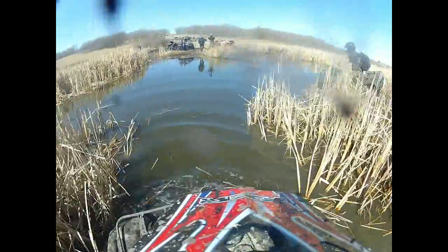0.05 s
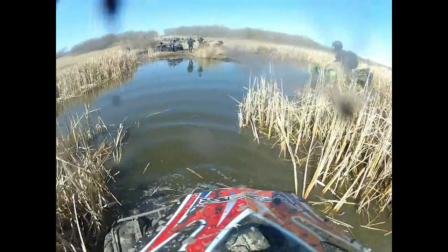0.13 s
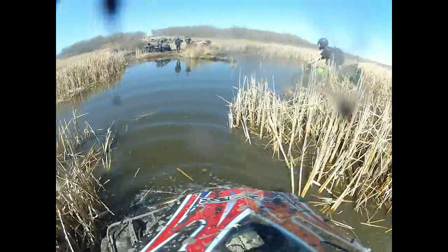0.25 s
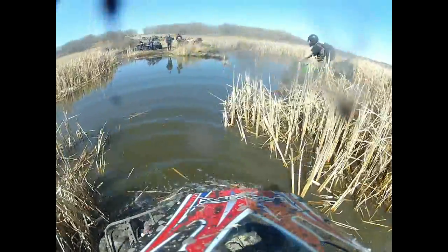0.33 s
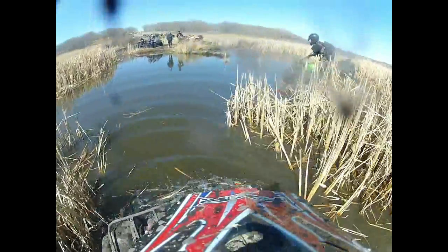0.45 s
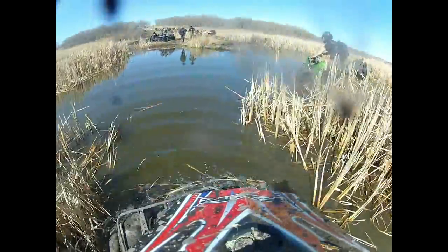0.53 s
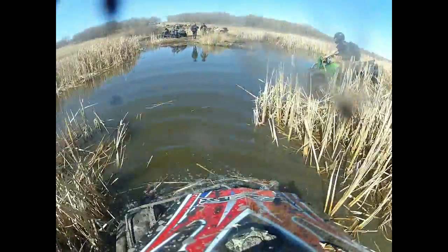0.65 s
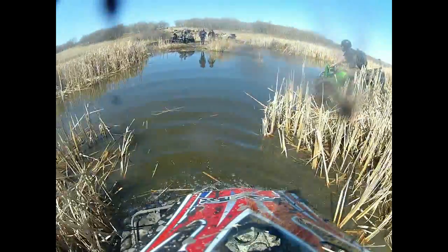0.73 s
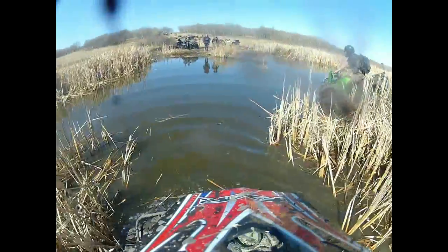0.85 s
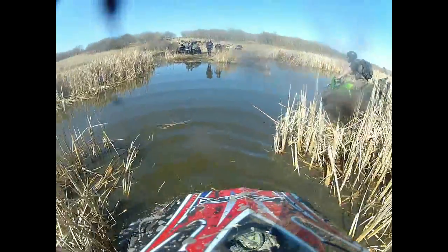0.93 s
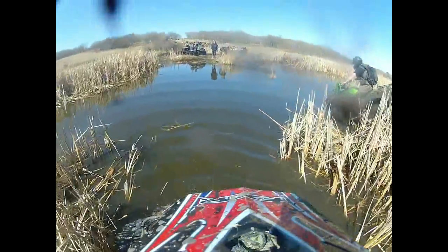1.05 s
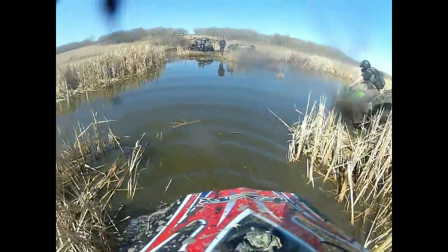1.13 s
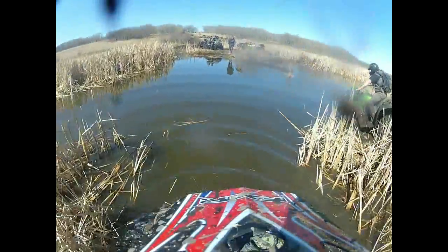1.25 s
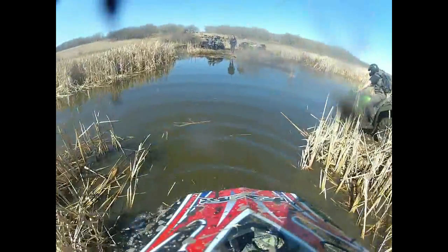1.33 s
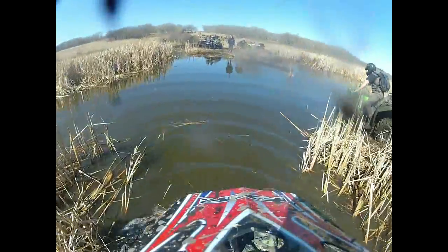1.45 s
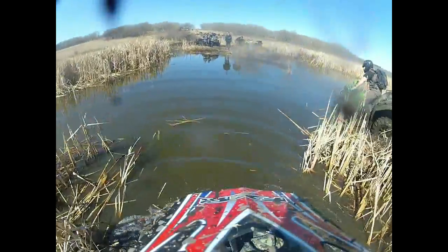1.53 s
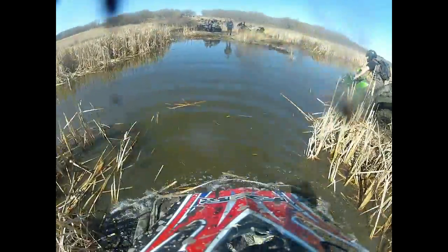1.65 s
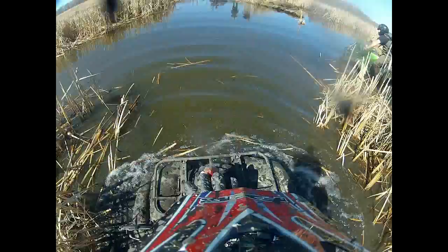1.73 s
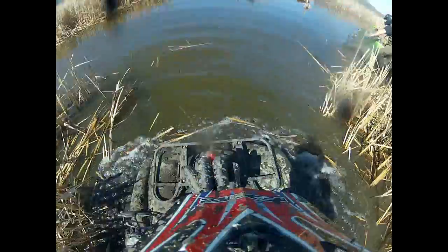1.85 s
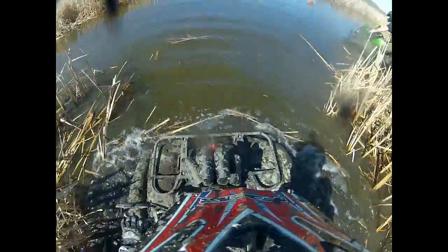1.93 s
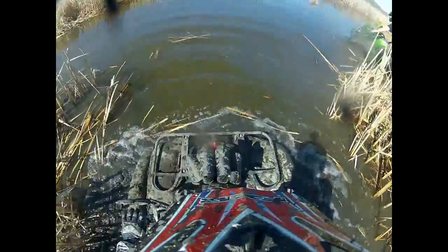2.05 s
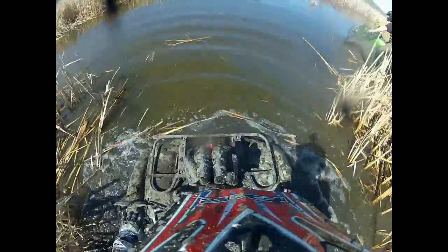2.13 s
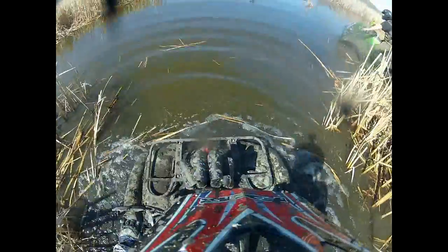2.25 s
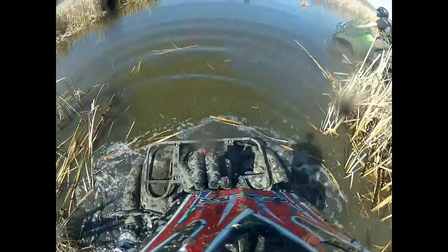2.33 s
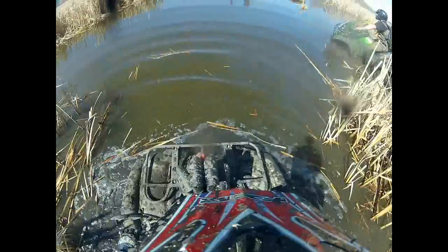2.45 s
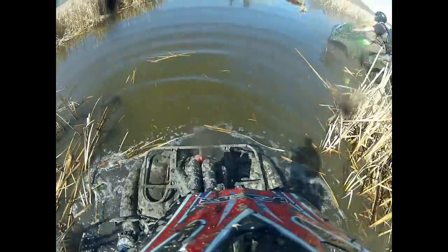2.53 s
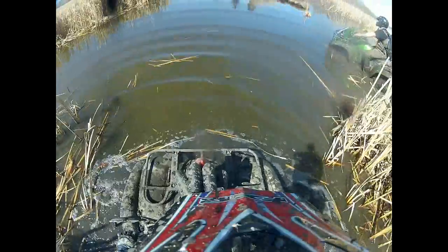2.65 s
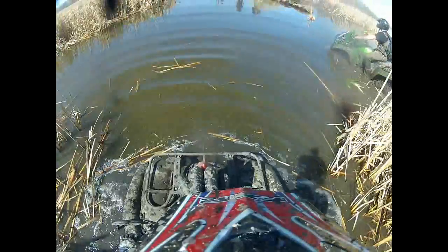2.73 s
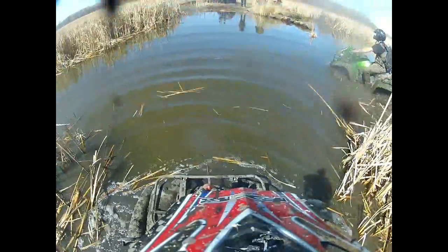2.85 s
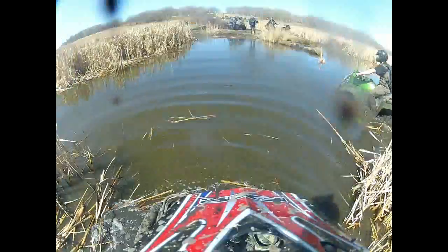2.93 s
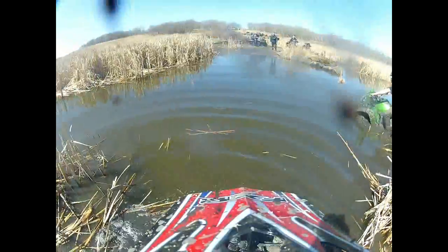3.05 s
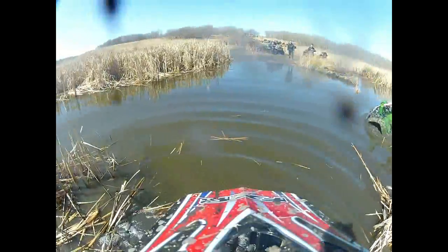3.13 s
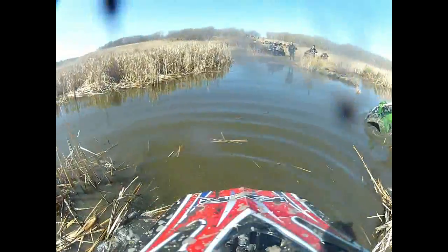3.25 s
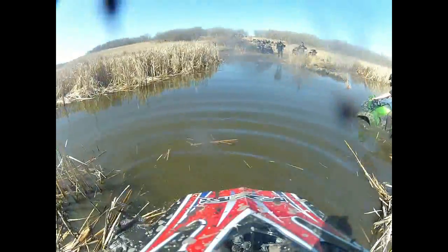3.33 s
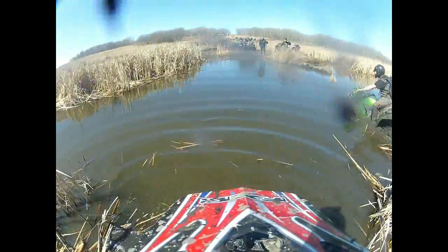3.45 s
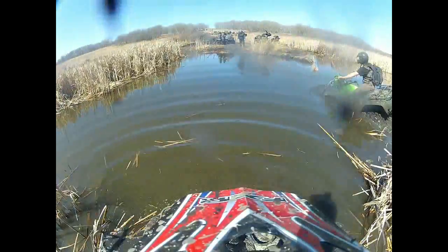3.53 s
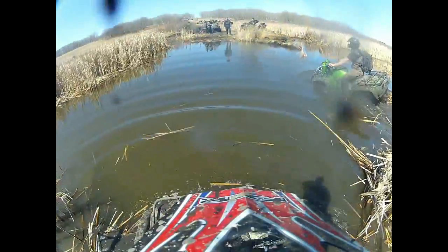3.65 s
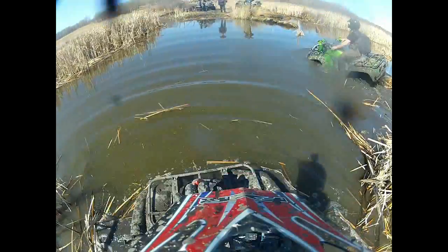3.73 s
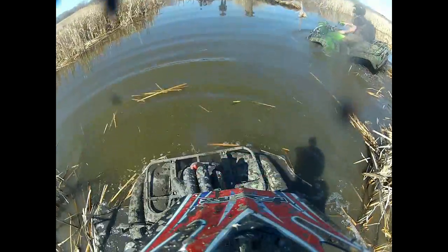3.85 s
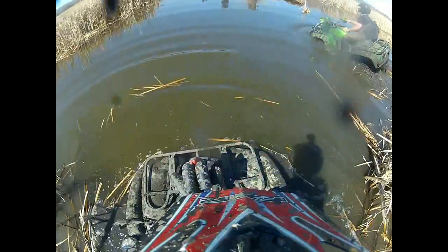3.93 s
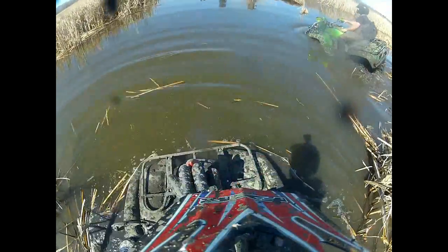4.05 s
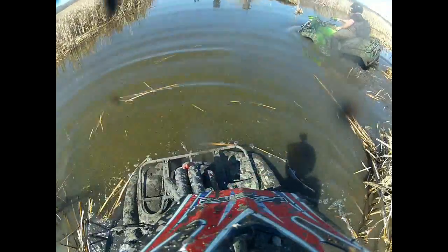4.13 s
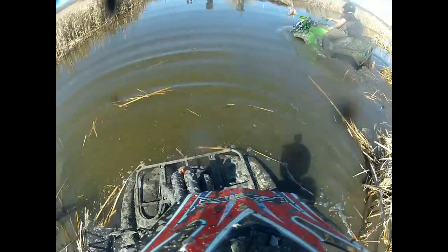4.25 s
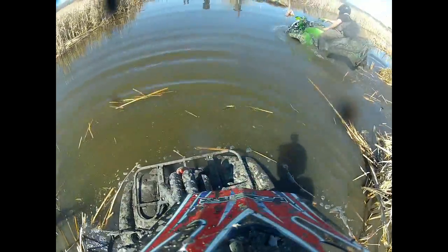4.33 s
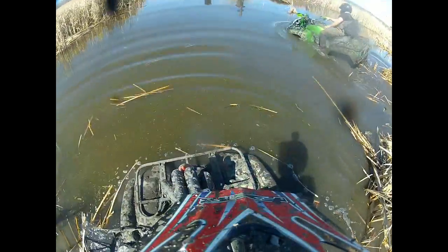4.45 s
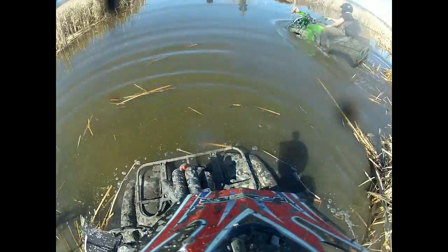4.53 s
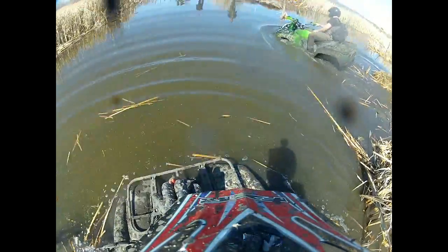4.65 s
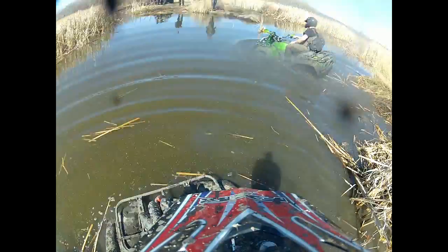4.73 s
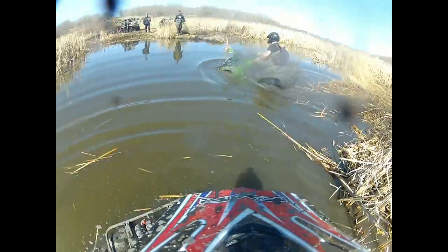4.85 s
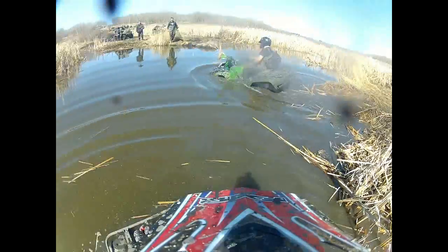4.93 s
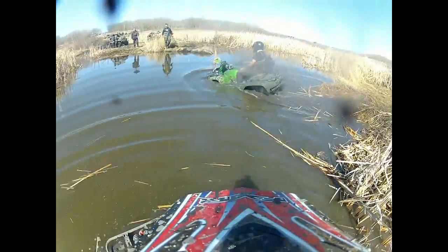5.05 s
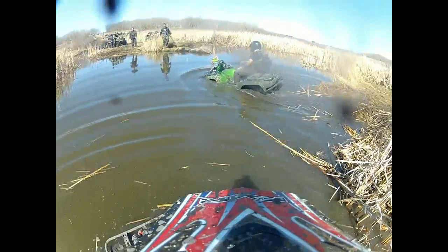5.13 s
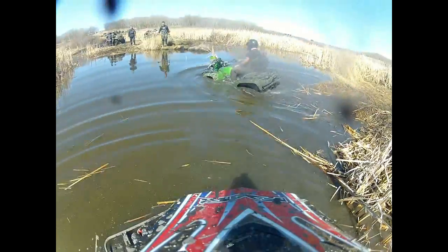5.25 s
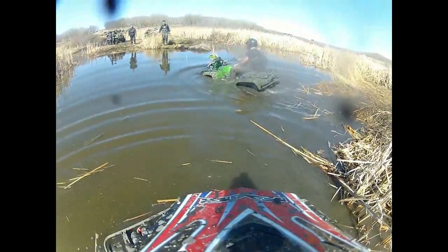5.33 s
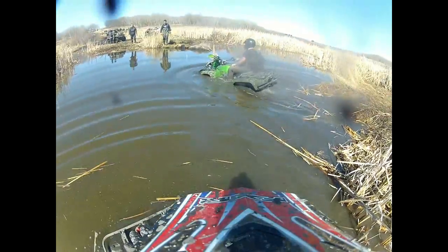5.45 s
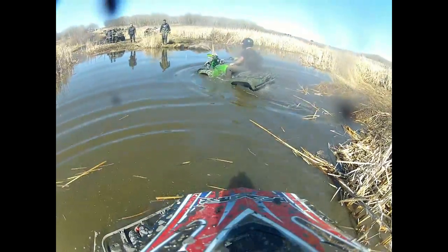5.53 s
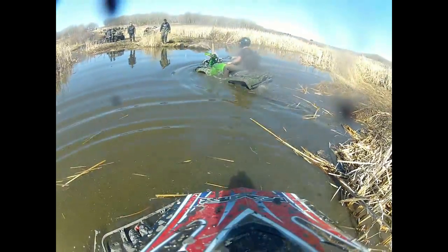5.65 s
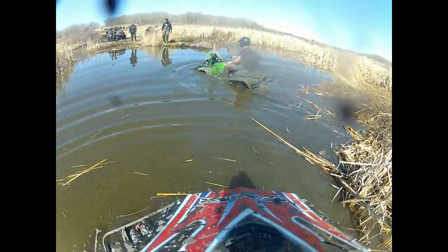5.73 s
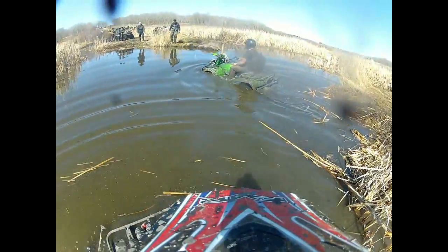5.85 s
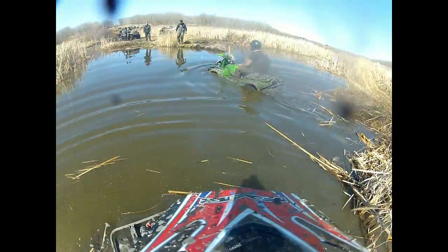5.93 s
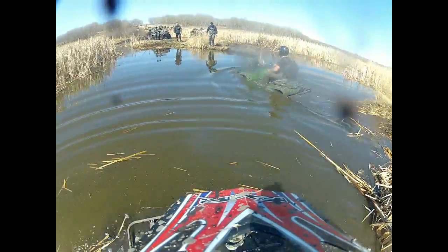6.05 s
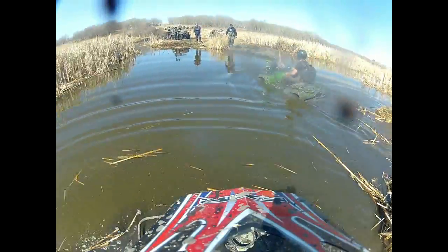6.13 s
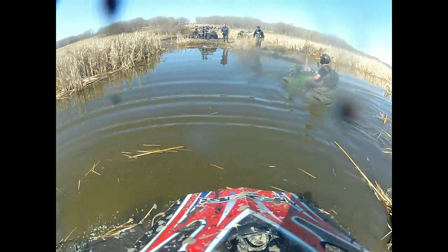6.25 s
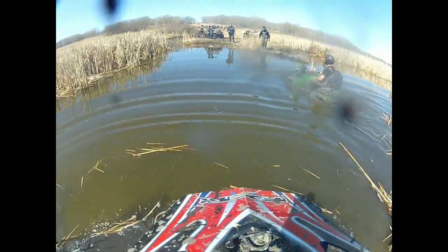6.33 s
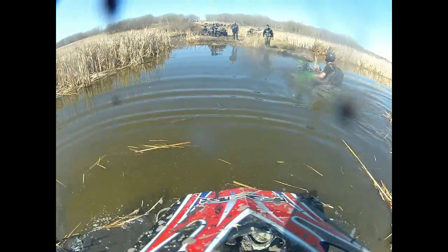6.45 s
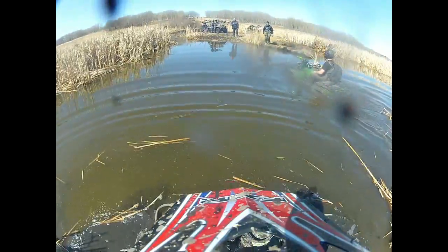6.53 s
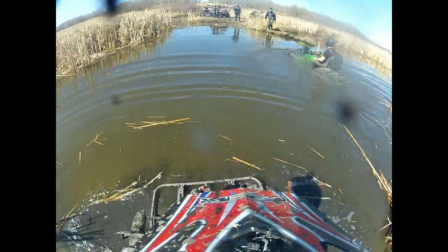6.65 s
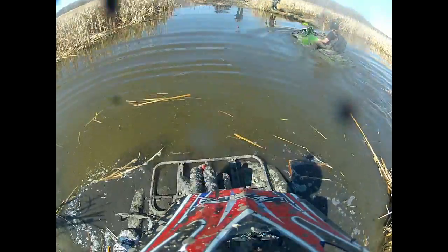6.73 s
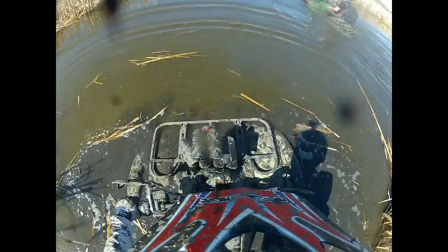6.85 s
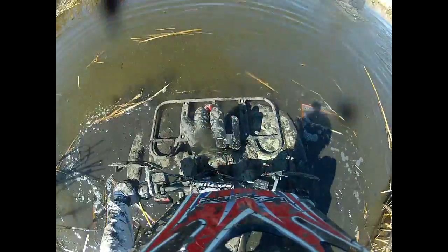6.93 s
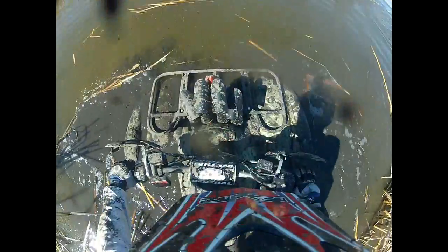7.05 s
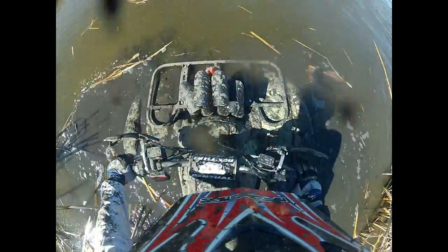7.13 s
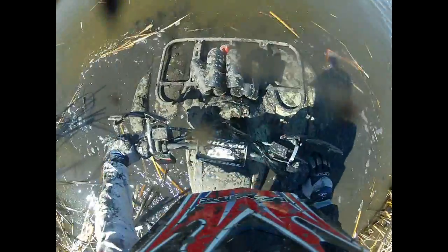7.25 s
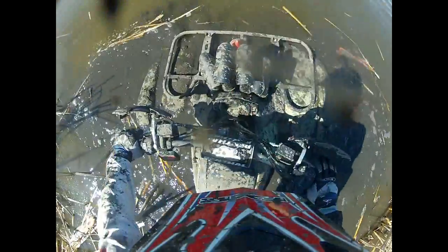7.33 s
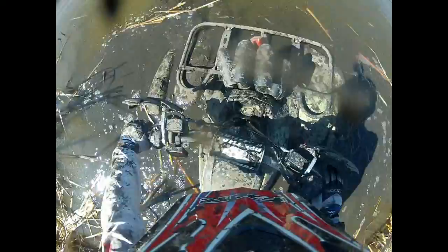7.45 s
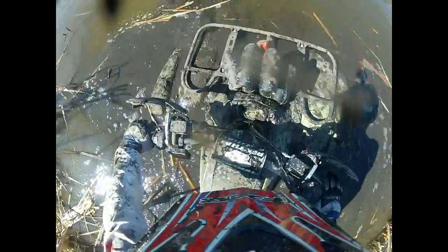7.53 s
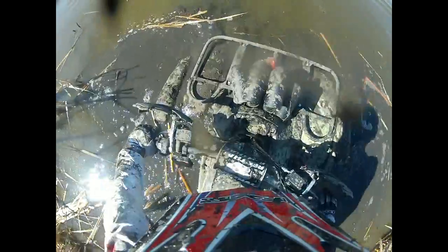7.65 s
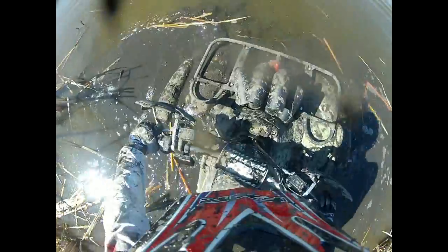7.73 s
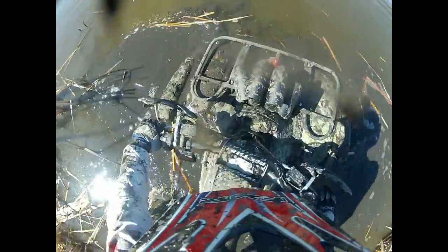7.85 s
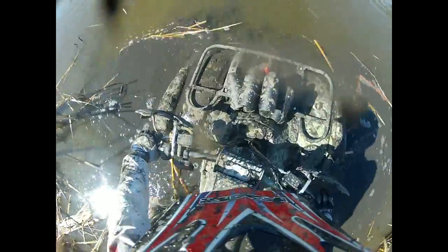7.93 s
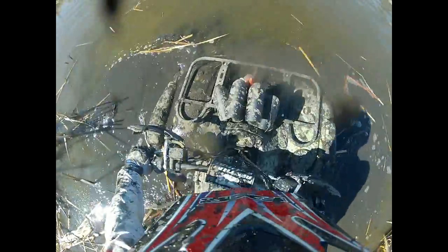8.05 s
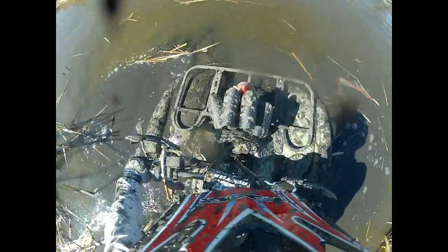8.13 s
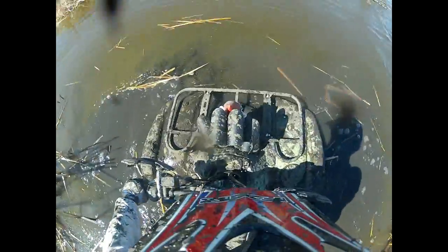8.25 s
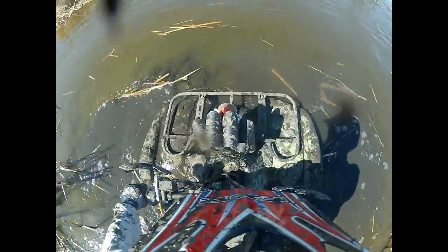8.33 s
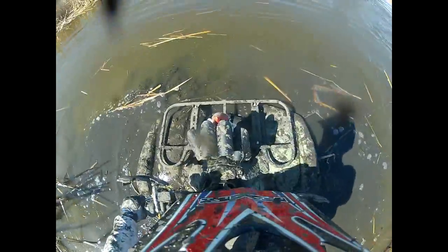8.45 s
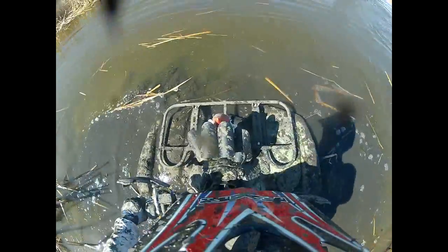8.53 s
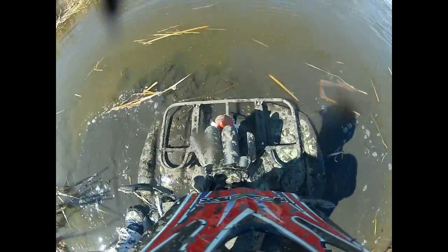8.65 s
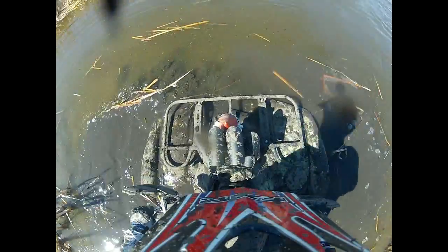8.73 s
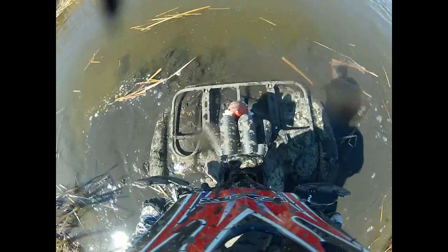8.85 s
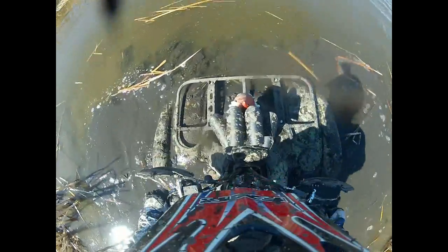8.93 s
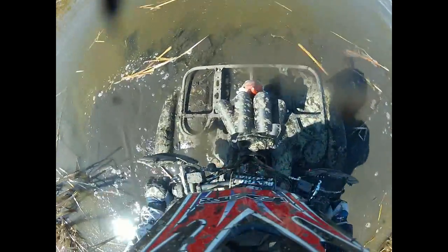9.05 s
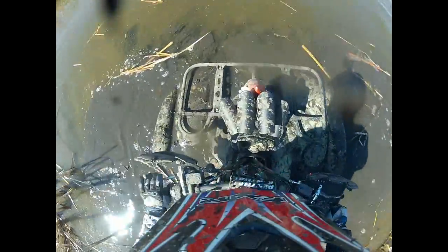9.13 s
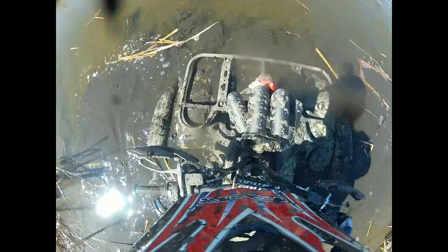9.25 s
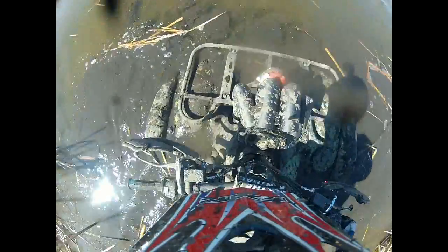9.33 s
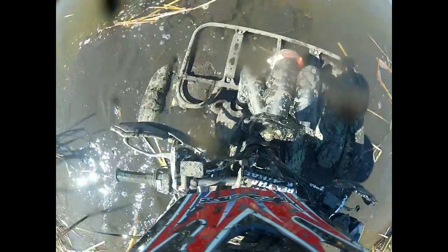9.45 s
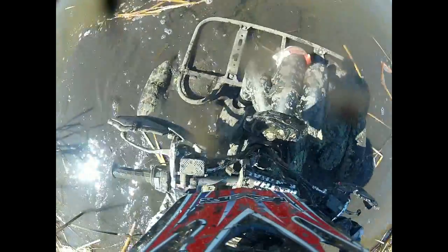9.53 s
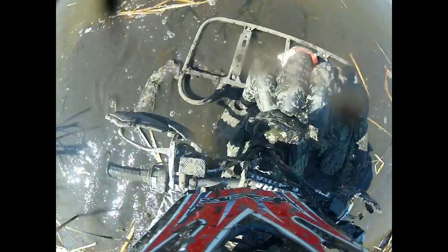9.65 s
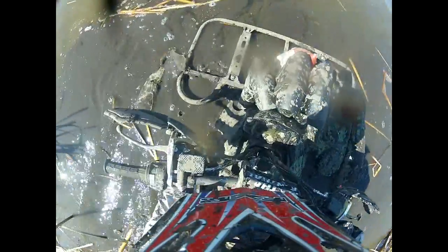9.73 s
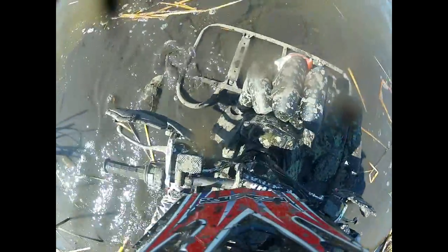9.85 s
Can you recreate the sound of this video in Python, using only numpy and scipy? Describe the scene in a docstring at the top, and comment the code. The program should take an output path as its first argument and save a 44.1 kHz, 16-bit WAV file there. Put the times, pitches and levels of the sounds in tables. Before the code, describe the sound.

Loud, uneven exhaust thumps and churning water open the scene, with a brief rubber squeak. The near engine soon settles into a submerged putter with rattling valve gear and gurgling, leaving another ATV's smooth low hum clearer. Knocks and clicks lead into short throttle blips, a deep thump and a final pickup with a faint hoot. Close helmet microphone outdoors, no room echo, gritty treble.

```python
"""Deep marsh water, heard from the helmet camera of a rider on a single-cylinder ATV; a second ATV runs nearby.
The exhaust thumps and barks: each firing is a puff that echoes in the pipe, stronger with each dab of throttle.
Noise pulsing with the firings makes the engine clatter and the water wash; droplets fizz, damped tones gulp and thump.
Noise cracks snap like reeds and ring the camera's case; panels knock, wet rubber squeaks, a faint tone hoots.
The camera's coarse sampling mirrors the sound into the treble."""
import sys
import numpy as np
from scipy import signal
from scipy.fft import rfft, irfft, next_fast_len
from scipy.io import wavfile
from scipy.ndimage import map_coordinates

SR = 44100
rng = np.random.default_rng(int(sys.argv[2]) if len(sys.argv) > 2 else 0)


def output_pcm(signal):
    """Save a mono or channel-first signal as 16-bit PCM at the path in sys.argv[1].

    Samples are clipped to [-1, 1] before scaling.
    """
    pcm = np.clip(np.atleast_2d(signal).T, -1, 1) * 32767
    wavfile.write(sys.argv[1], SR, np.round(pcm).astype(np.int16))


N = 436590


def amp(db):
    """Decibels to gain."""
    return 10 ** (np.asarray(db) / 20)


def unit(x):
    """Scale x to rms 1."""
    return x / np.sqrt(np.mean(x ** 2) + 1e-20)


def curves(rows):
    """Interpolate each column after the time to one value per sample."""
    times, *columns = np.transpose(rows)
    return [np.interp(np.arange(N) / SR, times, column) for column in columns]


def wobble(rate):
    """A smooth random curve with rate knots a second."""
    knots = rng.standard_normal(1000)
    coarse = np.arange(0, N, 64)
    values = map_coordinates(knots, [coarse * rate / SR], mode="wrap")
    return np.interp(np.arange(N), coarse, values)


def opened(start, end, lag):
    """Rise towards 1 from start and fall back from end, with a lag in seconds."""
    t = np.arange(N) / SR
    return np.exp(-np.maximum(t - end, 0) / lag) - np.exp(-np.maximum(t - start, 0) / lag)


def swells(rows):
    """Add up bell-shaped rises from (centre s, half-width s, height) rows."""
    t = np.arange(N) / SR
    return sum(height * np.exp(-((t - s) / width) ** 2) for s, width, height in rows)


def colour(x, points):
    """Filter x causally (minimum phase) to the gains of the (Hz, dB) points."""
    size = next_fast_len(N + SR // 2)
    hz, db = np.transpose(points)
    log_hz = np.log(np.fft.rfftfreq(size, 1 / SR) + 1)
    gain = amp(np.interp(log_hz, np.log(hz), db))
    # folding the cepstrum forward leaves no response before the sound
    cepstrum = irfft(np.log(gain), size)
    cepstrum[1:size // 2] *= 2
    cepstrum[size // 2 + 1:] = 0
    return irfft(rfft(x, size) * np.exp(rfft(cepstrum)), size)[:N]


def place(times, sounds):
    """Add rows of sound into the scene at their times."""
    starts = np.round(np.asarray(times) * SR).astype(int)
    index = starts[:, None] + np.arange(sounds.shape[1])
    return np.bincount(np.maximum(index, 0).ravel(), sounds.ravel(), N)[:N]


def firings(speed):
    """The sample of each firing, once per engine cycle."""
    return np.flatnonzero(np.diff(np.floor(np.cumsum(speed) / SR + .5)))


def throb(fired, decay, share, scatter_db):
    """An envelope near 1, of which a share jumps at each firing and dies away."""
    t = np.arange(SR // 12) / SR
    sizes = amp(scatter_db * rng.standard_normal((len(fired), 1)))
    share = np.clip(share, 0, 1)
    pulses = unit(place(fired / SR, sizes * np.exp(-t / decay)))
    return 1 - share + 1.6 * share * pulses


def droplets(count, hz, spread, cycles, size_db):
    """Tiny bursting bubbles, each a few cycles of rising pitch."""
    t = np.arange(SR // 100) / SR
    when, size = rng.random((2, count))
    pitch = np.clip(hz * np.exp(spread * rng.standard_normal((count, 1))), 300, 5500)
    age = pitch * t / cycles
    sizes = amp(-size_db * np.log(np.maximum(size[:, None], .01)))
    rising = 1 + 0.057 * np.minimum(age, 4)
    rings = np.exp(-age) * np.sin(2 * np.pi * pitch * t * rising)
    return unit(place(when * N / SR, sizes * rings))


# the rider looks down, nearer the engine, and the helmet shades the second ATV: start, end t/s
LOOK_DOWN_S = (6.95, 9.9)
# the second ATV's speed and relative level: t/s, firing rate/(cycles per s), level/dB
OTHER = [(0, 25.85, -52), (4.2, 25.9, -45), (5.05, 25.9, -46), (5.9, 28, -45), (7.3, 29.5, -46.5),
         (8.1, 29.9, -49), (8.7, 27.5, -49), (9.4, 27, -49), (9.9, 32, -45)]
# tone of its exhaust: f/Hz, level/dB
DRONE = [(30, -27), (70, 5.5), (105, 6.5), (140, 4.5), (180, 5.5), (230, -4), (275, 3), (320, 0.5),
         (400, -12.5), (500, -7.5), (590, -32), (720, -40), (830, -20), (1200, -23.5), (2500, -43.5)]
# how the helmet shades it: f/Hz, level/dB
SHADE = [(280, 2), (370, -11.5), (520, -4), (1200, -0.5)]
# its valves tick loudest as it draws ahead: t/s, half-width/s, extra level/dB
TAPPET_SWELL = [(5.55, 0.57, 17.5)]


def other_atv(level_db=-1, hum_db=-3, tappet_db=-68):
    """A second engine, faster and smoother, with a hum on its fourth order and ticking valves."""
    speed, db = curves(OTHER)
    fired = firings(speed)
    puffs = place(fired / SR, amp(.5 * rng.standard_normal((len(fired), 1))))
    drone = unit(colour(puffs, DRONE))
    shaded = opened(*LOOK_DOWN_S, lag=0.24)
    drone = (1 - shaded) * drone + shaded * colour(drone, SHADE)
    fourth_order = np.sin(2 * np.pi * 4 * np.cumsum(speed) / SR)
    hum = amp(hum_db + wobble(5)) * fourth_order
    taps = rng.standard_normal(N) * throb(fired, decay=.01, share=1, scatter_db=1)
    tappets = unit(colour(taps, CLATTER) + 0.11 * colour(taps, SNAP))
    burst_db = 7 * opened(7.62, 8.11, lag=0.013)  # its one burst of throttle
    exhaust_and_hum = amp(db + burst_db + level_db) * (drone + hum)
    return exhaust_and_hum + amp(swells(TAPPET_SWELL) + tappet_db) * tappets


# relative level of the wash round the wheels: t/s, level/dB
WASHING = [(0, -52), (3.4, -53.5), (3.9, -57), (4.9, -57.5), (5.7, -59.5), (6.25, -59), (6.85, -65),
           (7.5, -62.5), (8, -55.5), (8.25, -64.5), (9.9, -60)]
# tone of the wash: f/Hz, level/dB
WASH = [(400, 13.5), (650, -6), (830, 9.5), (900, -1), (1100, 5.5), (1300, -17), (1480, 3), (1650, -9.5),
        (1900, 3.5), (2500, -1.5), (3000, 2), (3550, 1.5), (4000, -7), (5800, -11)]
# tone of the low heave: f/Hz, level/dB
HEAVE = [(15, -52), (28, -16), (42, 2), (58, -10), (80, -5), (150, -2), (270, -4.5), (340, -2),
         (500, -10.5), (620, -22), (1200, -39.5)]


def water(fired, effort, pulsing, sputter_db, wash_db=6.0, wash_sputter=0.16, slosh=0.17,
          heave_db=-54, heave_effort_db=7.0, heave_sputter=0.86):
    """Churned water washes and fizzes with the exhaust, and heaves round the hull as the engine pushes."""
    fizz = droplets(count=5000, hz=2426, spread=0.604, cycles=3.65, size_db=2.5)
    spray = rng.standard_normal(N) + 0.29 * fizz
    wash = unit(colour(spray * throb(fired, decay=0.014, share=pulsing, scatter_db=5.0), WASH))
    heave = unit(colour(rng.standard_normal(N), HEAVE))
    slosh_db = (0.44 + slosh * sputter_db) * wobble(22)
    washing_db = curves(WASHING)[0] + wash_db + wash_sputter * sputter_db + slosh_db
    surge_db = heave_db + heave_effort_db * effort + heave_sputter * sputter_db + wobble(9.4)
    return amp(washing_db) * wash + amp(surge_db) * heave


def gurgle(fired, effort, sputter_db, level_db=-65.0, effort_db=3):
    """Larger bubbles burble at the surface, pushed out stroke by stroke."""
    bubbles = droplets(count=7000, hz=870, spread=.17, cycles=1.8, size_db=2.5)
    strokes = throb(fired, decay=0.02, share=0.45, scatter_db=7.5)
    return amp(level_db + effort_db * effort + sputter_db) * bubbles * strokes


# gulps and low thumps, some the boom under a knock: t/s, level/dB, f/Hz, t60/s
GULPS_AND_THUMPS = [(4.212, -35, 293.4, 0.31), (4.226, -28, 375, 0.061), (5.956, -31.5, 272, 0.14),
                    (9.03, -20, 79.72, 0.34), (9.023, -25, 183, 0.1), (9.548, -19.5, 271.5, 0.074),
                    (9.55, -37.5, 76, 1)]


def gulps_and_thumps(attack=0.00049):
    """Damped sine tones with a fast onset: gulps and low thumps, some the boom under a knock."""
    s, db, hz, t60 = np.transpose(GULPS_AND_THUMPS)[:, :, None]
    t = np.arange(SR // 3) / SR
    rings = np.sin(2 * np.pi * hz * t) * (1 - np.exp(-t / attack))
    return place(s[:, 0], amp(db - 60 * t / t60) * rings)


# sharp ticks and rattles, relative levels: t/s, level/dB, case ring level/dB over the crack
TICKS = [(1.781, -49.5, 25.5), (2.484, -48, 20), (2.725, -51, 23), (3.438, -39, 16.5), (5.457, -40, 8),
         (5.494, -47, 24), (5.532, -43, 12.5), (5.567, -38, 1), (6.179, -42, -27), (7.254, -49.5, 22.5),
         (7.294, -48, 20), (8.129, -37, -6), (8.237, -40.5, -1), (9.2222, -32.5, -2), (9.2587, -39.5, -33),
         (9.726, -33.5, 11)]
# tone of a snap: f/Hz, level/dB
SNAP = [(900, -11), (1500, -12), (2000, 6), (3300, 9), (4200, 1), (5600, -4.5)]


def ticks(snap_db=-3, ring_db=5):
    """Short noise cracks, each with its share of the case's ring."""
    s, db, case_db = np.transpose(TICKS)
    t = np.arange(SR // 16) / SR
    cracks = amp(db[:, None] - 60 * t / .045) * rng.standard_normal((len(s), len(t)))
    snap = colour(place(s, cracks * amp(snap_db)), SNAP)
    ring = colour(place(s, cracks * amp(case_db[:, None] + ring_db)), CLATTER)
    return snap + ring


# knocks on the plastic bodywork: t/s, level/dB before the panel's tone, t60/s
KNOCKS = [(6.622, -31, .14), (6.969, -24.5, .11), (9.022, -20, .04)]
# tone of the panels: f/Hz, level/dB
PANEL = [(300, 3), (700, -9.5), (1100, 0), (1500, -17), (1800, 3), (1980, -7), (2180, 10.5), (2450, -18),
         (3000, -8), (4000, -28), (5600, -27)]


def knocks():
    """Dull blows of decaying noise ring the panels briefly."""
    s, db, t60 = np.transpose(KNOCKS)[:, :, None]
    t = np.arange(SR // 8) / SR
    blows = amp(db - 60 * t / t60) * rng.standard_normal((len(s), len(t)))
    return colour(place(s[:, 0], blows), PANEL)


# squeaks of wet rubber: t/s, level/dB, f/Hz, length/s
SQUEAKS = [(.322, -44, 1890, .04), (.36, -46, 1910, .065)]


def squeaks():
    """Brief rubs with a slightly unsteady pitch."""
    s, db, hz, length = np.transpose(SQUEAKS)[:, :, None]
    t = np.arange(SR // 5) / SR
    pitch = hz * (1 + .1 * rng.standard_normal((len(s), len(t))))
    swell = np.sin(np.pi * np.minimum(t / length, 1))
    return place(s[:, 0], amp(db) * swell * np.sin(2 * np.pi * np.cumsum(pitch, axis=1) / SR))


# tone of the hoot: f/Hz, level/dB
HOOT = [(850, -40), (1030, -8), (1110, 2), (1190, -10), (1400, -39)]


def hoot(level_db=-59):
    """A faint hollow tone of narrow noise sounds as the engine picks up at the end."""
    tone = unit(colour(rng.standard_normal(N), HOOT))
    return amp(level_db) * opened(9.5, 9.9, lag=0.034) * tone


# tone of the rattling valve gear and the ringing case: f/Hz, level/dB
CLATTER = [(700, -26), (1100, -10.5), (1400, -18.5), (1700, -16.5), (2000, -7), (2170, 6), (2330, -6.5),
           (2500, -27), (2750, -7.5), (3100, -48.5), (5500, -22)]


def clatter(fired, effort, pulsing, level_db=-57, effort_db=4, with_wash=0.31, nearer_db=2):
    """Valve gear and drive rattle in time with the engine, louder under load, and ring the camera's case."""
    beats = throb(fired, decay=.028, share=pulsing, scatter_db=4)
    rattle = rng.standard_normal(N) * beats * amp(2.1 * wobble(70))
    wash_db = curves(WASHING)[0]
    near_db = nearer_db * opened(*LOOK_DOWN_S, lag=0.087)
    db = level_db + effort_db * effort + with_wash * (wash_db - wash_db.mean()) + near_db
    return amp(db) * unit(colour(rattle, CLATTER))


# underlying engine speed, unsteady, to which the dabs add: t/s, firing rate/(firings per s)
BASE_SPEED = [(0, 21.74), (.83, 21.72), (1.48, 18.04), (1.8, 20.97), (2.7, 20.12), (4.42, 19.86),
              (4.51, 21.85), (5.34, 18.76), (5.41, 20.52), (6.34, 17.61), (7.16, 21.35), (7.21, 23.09),
              (8.71, 22.43), (9.9, 26.18)]
# dabs of throttle, relative levels: start t/s, end t/s, extra rate/(firings per s),
# thump level/dB, bark level/dB, swell while held/(dB per s)
DABS = [(0, 0.088, 4.74, -17.5, -7, -6), (.35, .53, 2.83, -25, -1.5, 26), (.84, .96, 3.32, -23, 1, 14),
        (1.334, 2.629, .9, -25, -26, -1.5), (2.627, 3.652, 0.95, -30, -19.5, -3.5),
        (6.98, 7.3, .9, -34.5, -12, -5.5), (7.698, 8.015, 1.87, -39, -16.5, -9),
        (9.537, 9.897, 0.48, -38.5, -19, -13)]


def throttle(spin_up_s=.066):
    """Effort 0-1 and firings per second: each dab spins the engine up above its underlying speed."""
    start, end, rise = np.transpose(DABS)[:3, :, None]
    spin = opened(start, end, spin_up_s)
    return spin.sum(axis=0), curves(BASE_SPEED)[0] + (rise * spin).sum(axis=0)


# relative thump level between dabs, mostly falling as the pipe sinks: t/s, level/dB
IDLE = [(0, -27.5), (.8, -26.5), (1.1, -34), (1.25, -39.5), (3.78, -35), (3.9, -47), (4.55, -43.5),
        (6.35, -49), (6.6, -49.5), (9.9, -48)]
# single firings with their own thump and bark, some stronger, some weaker:
# t/s, change of thump level/dB, relative bark level/dB
ODD_FIRINGS = [(.11, -4, 0), (.15, -8, -3.5), (1.49, 3.5, -11), (1.73, 3, -16), (2.38, 6, -22),
               (2.62, 3, -30), (7.165, -4, -0.5), (7.33, 9.5, -17.5)]


def charges(fired, attack_db_per_s=259, release_db_per_s=111, bark_steepness=1.95):
    """Thump and bark dB of each firing: dabs attack, hold and release.

    Between dabs the thump rests at the idle level; a few single firings depart from it."""
    t = fired / SR
    start, end, _, thump_db, bark_db, swell = np.transpose(DABS)[:, :, None]
    held_db = swell * (np.clip(t, start, end) - start)
    shut_db = attack_db_per_s * np.maximum(start - t, 0) + release_db_per_s * np.maximum(t - end, 0)
    thump = np.maximum((thump_db + held_db - shut_db).max(axis=0), curves(IDLE)[0][fired])
    bark = (bark_db + held_db - bark_steepness * shut_db).max(axis=0)
    for s, change_db, own_bark_db in ODD_FIRINGS:
        nearest = np.argmin(abs(t - s))
        thump[nearest] += change_db
        bark[nearest] = own_bark_db
    return thump, bark


# tone of the exhaust's thump: f/Hz, level/dB
THUMP = [(20, -40.5), (42, -10.5), (65, -18.5), (100, -4), (150, -12), (228, -6.5), (259, 4), (292, -6.5),
         (400, -10), (510, -14.5), (590, -27.5), (720, -34.5), (1200, -58), (2500, -77.5)]
# tone of the bark of hard firings: f/Hz, level/dB
BARK = [(70, -56), (118, 4.5), (170, 6), (260, 8.5), (400, -5.5), (510, -3.5), (620, -12), (740, -11),
        (815, 0), (920, -14), (1150, -30), (2000, -61), (4000, -60)]


def exhaust(fired, level_db=-34, bark_db=-41.0, limp_db=0.75, echo=0.39, round_trip=0.00783, drift=.0001):
    """Each firing sends a puff down the pipe, which echoes it twice; hard firings bark."""
    chance = rng.standard_normal((len(fired), 3))
    charge_db, hard_db = charges(fired)
    limp = limp_db * (-1) ** np.arange(len(fired))  # strong and weak alternate
    strength = amp(charge_db + 1.2 * chance[:, 0] + limp)
    hardness = amp(hard_db + chance[:, 2])
    t = np.arange(SR // 50) / SR
    turbulence = rng.standard_normal((len(fired), len(t))) * np.exp(-t / 0.017)
    click = t == 0
    clean = click + .015 * turbulence
    ragged = click + .04 * turbulence
    trip = round_trip + drift * chance[:, 1]  # seconds; water shifts at the outlet

    def pipe(puffs):
        """The puffs and their two fading echoes."""
        return sum(echo ** k * place(fired / SR + k * trip, puffs) for k in range(3))

    thump = unit(colour(pipe(strength[:, None] * clean), THUMP))
    bark = unit(colour(pipe(hardness[:, None] * ragged), BARK))
    return amp(level_db) * thump + amp(bark_db) * bark


# the outlet dips under water and each stroke sputters: t/s, half-width/s, extra bubble level/dB
SPUTTERS = [(.15, 1, 5), (3.35, 0.52, 5.5), (6.1, 0.55, 7.5), (7.15, 0.17, 8.5), (8.55, 0.14, 6),
            (9.65, 0.42, 6)]


def scene():
    """Mix all sources dry, as in the open air; the throttle drives engine and water alike."""
    effort, speed = throttle()
    fired = firings(speed)
    sputter_db = swells(SPUTTERS)
    # share 0-1 of clatter and wash that pulses with the firings; more in a sputter
    pulsing = 0.17 + 0.0152 * sputter_db
    marsh = water(fired, effort, pulsing, sputter_db) + gurgle(fired, effort, sputter_db)
    details = gulps_and_thumps() + ticks() + knocks() + squeaks() + hoot()
    engines = other_atv() + clatter(fired, effort, pulsing) + exhaust(fired)
    return (marsh + details + engines)[None]


def record(dry, camera_hz=12000, cutoff_hz=5450, top_hz=15500):
    """The camera samples at 12 kHz and holds each value, which mirrors the sound around 12 kHz."""
    hz = np.fft.rfftfreq(N, 1 / SR)
    narrow = irfft(rfft(dry) / np.sqrt(1 + (hz / cutoff_hz) ** 44), N)
    coarse = signal.resample(narrow, round(N * camera_hz / SR), axis=1)
    held = signal.resample(np.repeat(coarse, 4, axis=1), N, axis=1)
    return irfft(rfft(held) * (hz < top_hz), N)


dry = scene()
out = record(dry)
output_pcm(out)
```